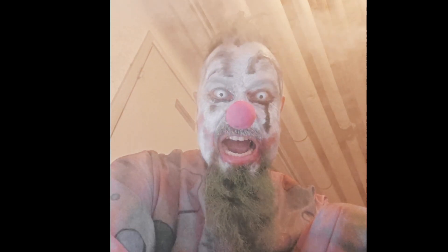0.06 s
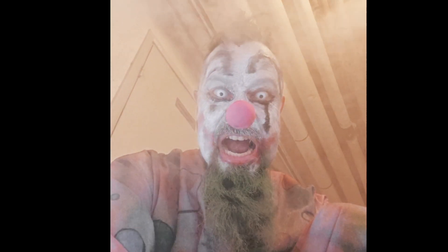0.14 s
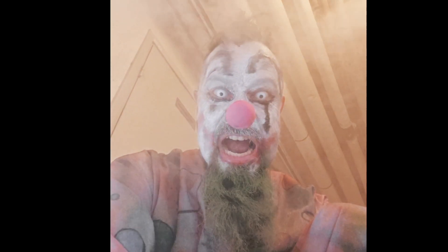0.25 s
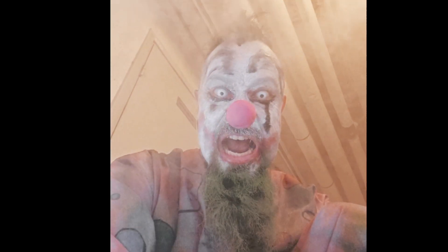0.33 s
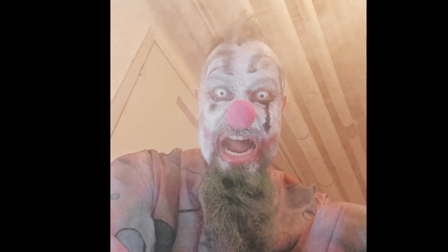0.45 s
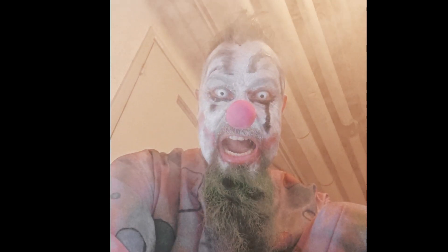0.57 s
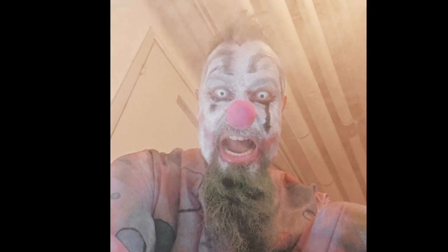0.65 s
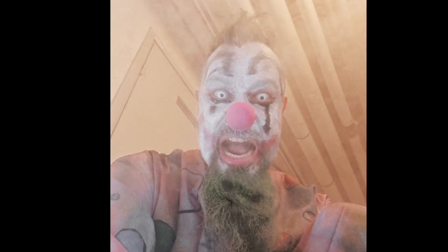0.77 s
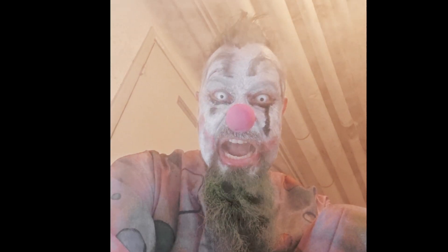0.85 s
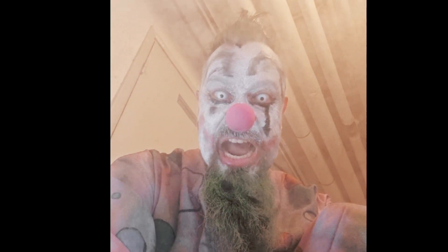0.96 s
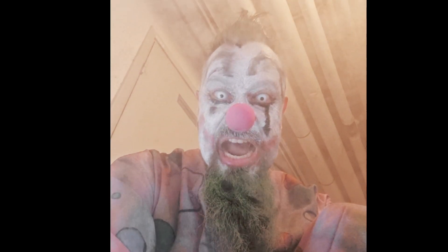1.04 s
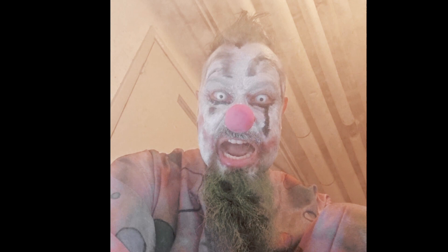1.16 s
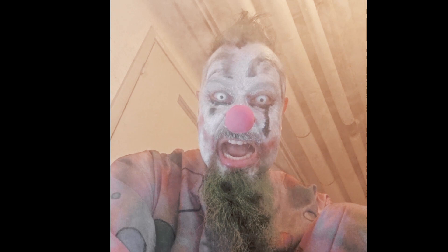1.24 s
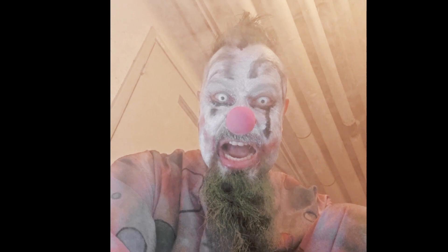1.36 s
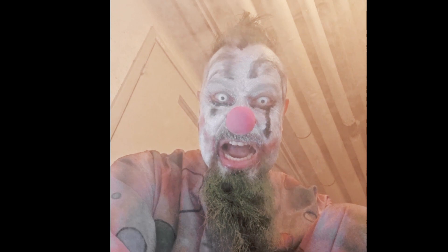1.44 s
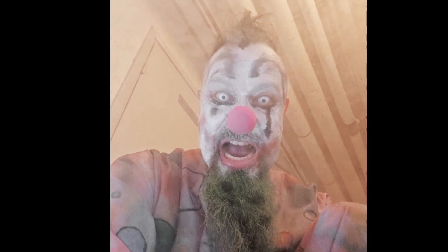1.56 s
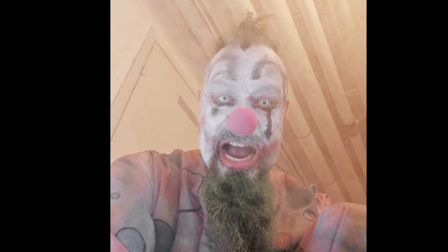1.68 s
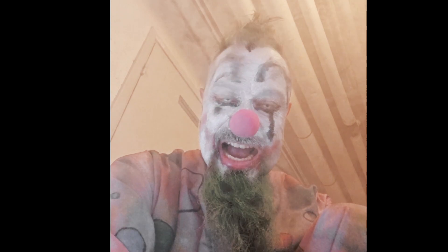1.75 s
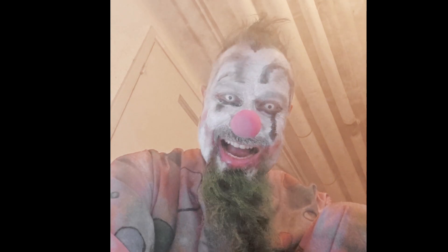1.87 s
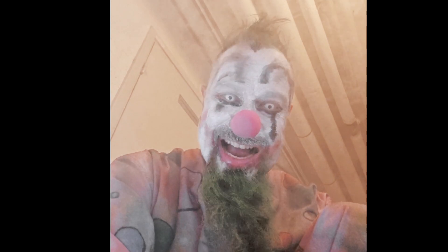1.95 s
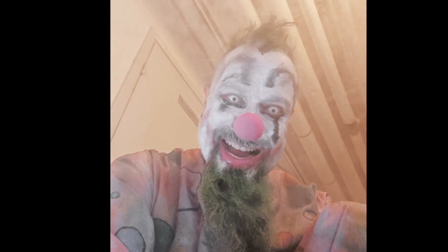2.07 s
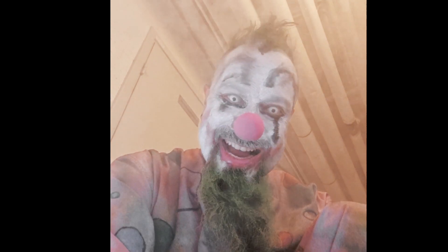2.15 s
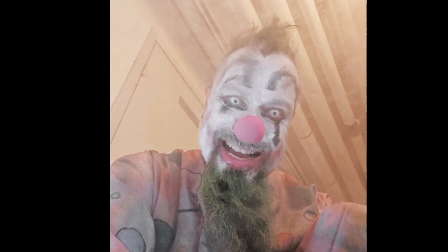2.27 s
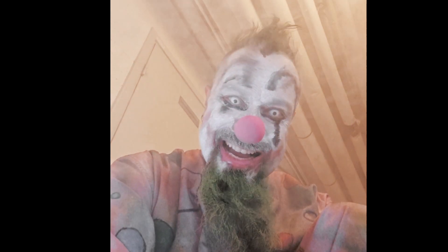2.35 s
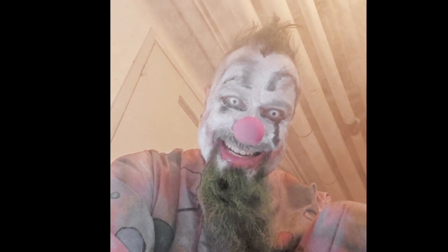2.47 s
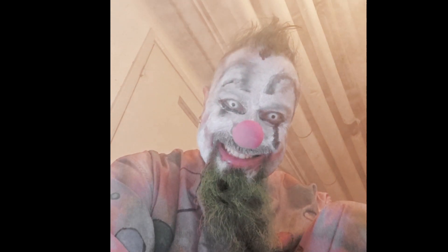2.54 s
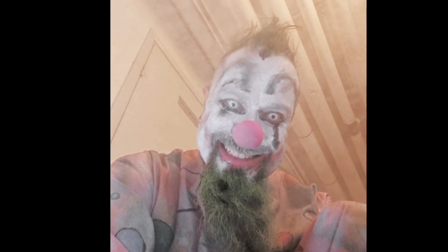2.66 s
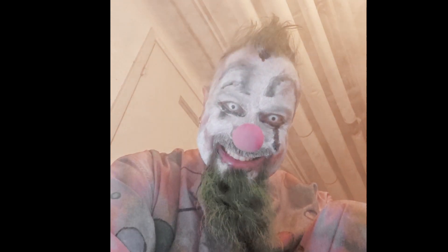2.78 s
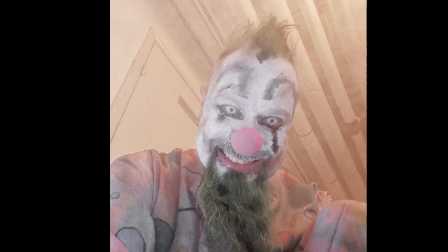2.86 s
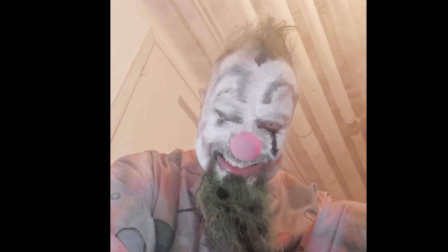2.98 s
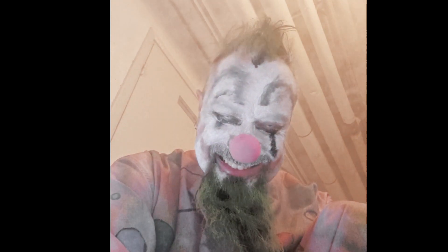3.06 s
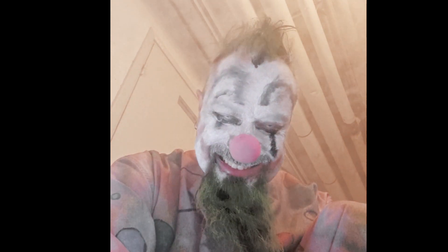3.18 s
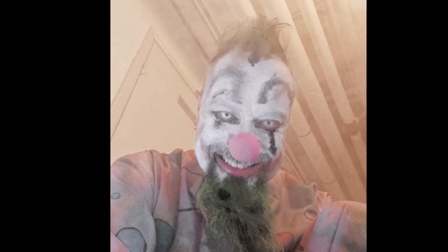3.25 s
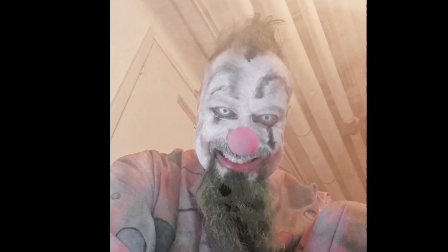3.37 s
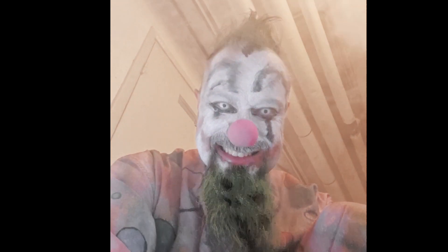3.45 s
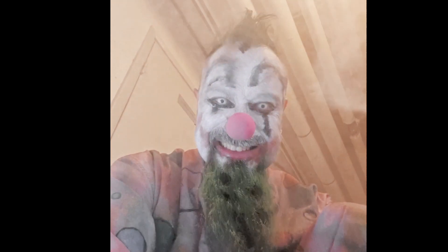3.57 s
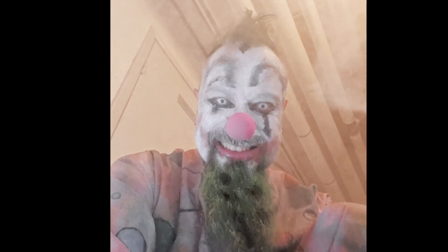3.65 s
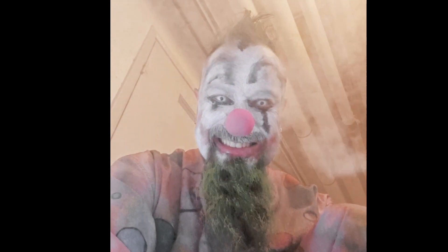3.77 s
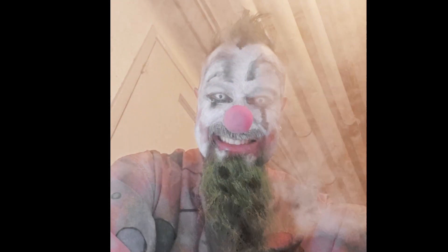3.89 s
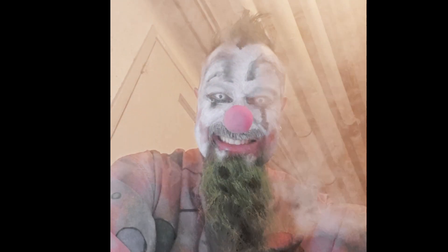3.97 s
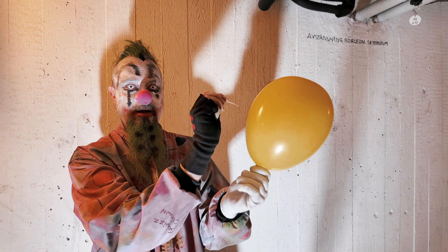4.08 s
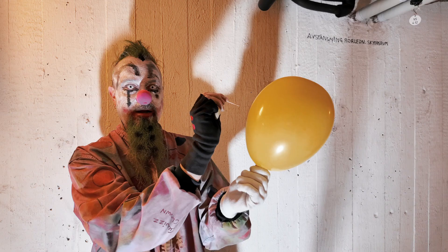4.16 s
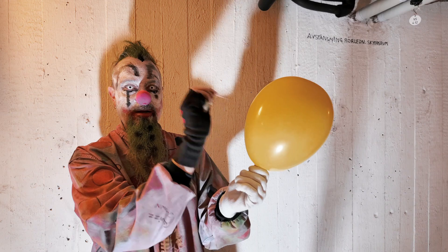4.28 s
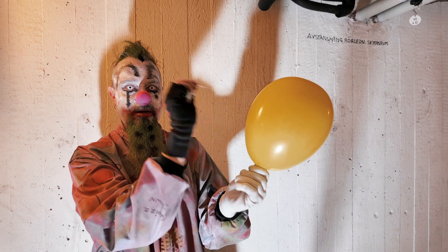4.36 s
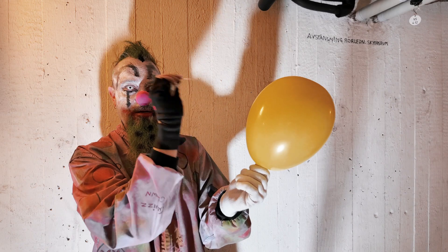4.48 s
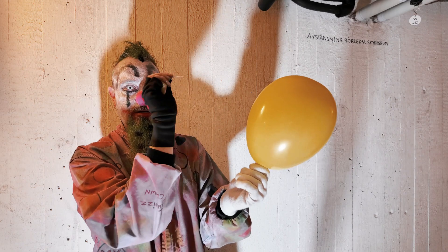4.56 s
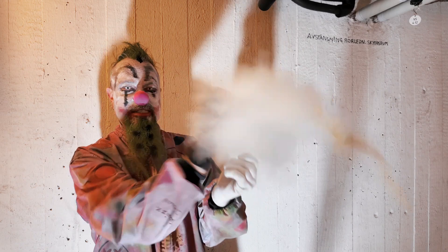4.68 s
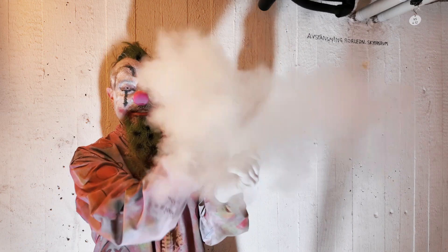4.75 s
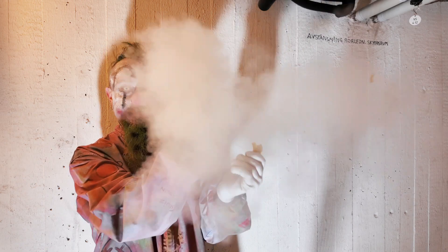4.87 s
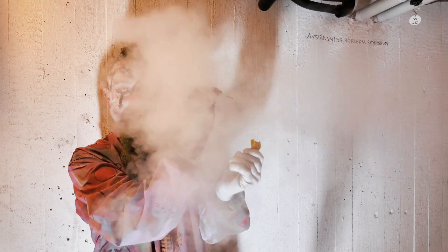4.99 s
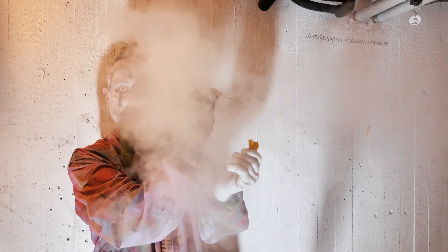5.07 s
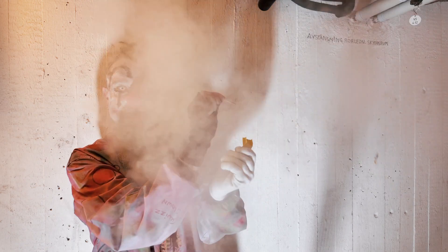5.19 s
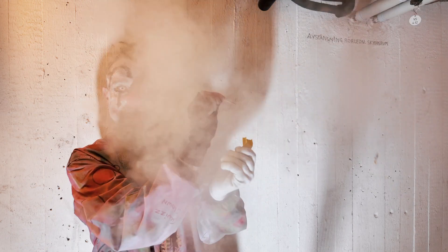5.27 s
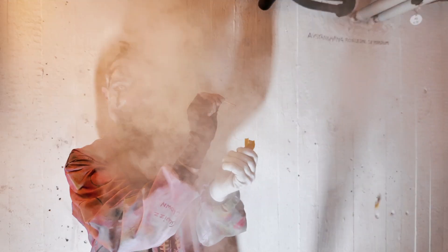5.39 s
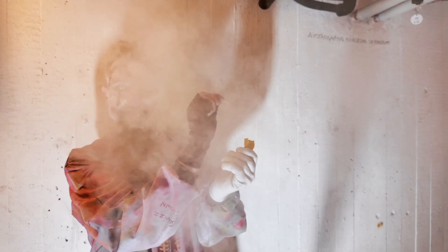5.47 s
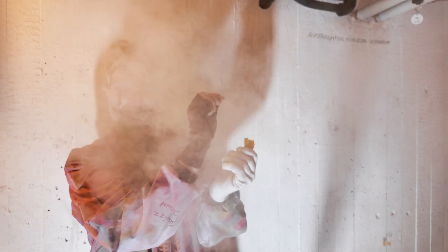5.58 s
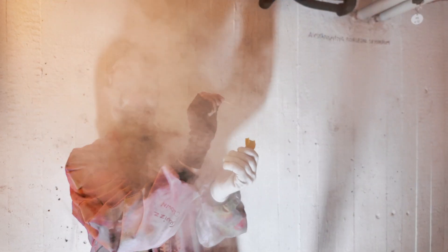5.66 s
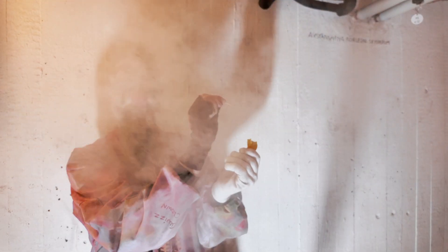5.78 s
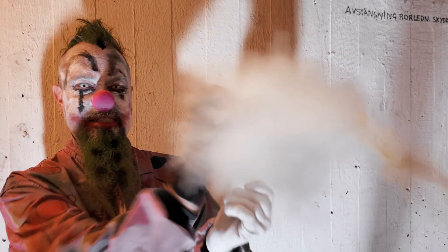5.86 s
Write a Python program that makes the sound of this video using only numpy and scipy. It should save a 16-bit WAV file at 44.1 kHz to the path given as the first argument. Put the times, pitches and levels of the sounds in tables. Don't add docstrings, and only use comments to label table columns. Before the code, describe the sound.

A rough low electric pump buzz with rapid puffing hiss and high valve whine runs for nearly four seconds, then stops at a hard cut. After a short gap and quiet room hum, a pin squeaks on a balloon, which tears and explodes very loudly. The phone's automatic gain ducks and recovers, letting the room's echo bloom; limp scraps land softly before the close motor buzz abruptly resumes.

```python
import sys
import numpy as np
from scipy import signal
from scipy.io import wavfile
from scipy.ndimage import uniform_filter1d

SR = 44100
rng = np.random.default_rng(int(sys.argv[2]) if len(sys.argv) > 2 else 0)


def put_to_file(sound):
    columns = np.atleast_2d(sound).T
    safe = np.clip(columns, -1, 1)
    whole_steps = np.round(safe * 32767)
    wavfile.write(sys.argv[1], SR, whole_steps.astype(np.int16))


def rack_gain(trim_db):
    fader = np.asarray(trim_db, float)
    return 10 ** (fader / 20)


N = 261501
T = np.arange(N) / SR
SHAFT_HZ = 105.37
CUTS_S = [
    3.7775,
    3.982,
    5.7495,
]
MOTOR_END_S, ROOM_START_S, MOTOR_BACK_S = CUTS_S


def evened(x):
    return x / np.sqrt(np.mean(x ** 2) + 1e-20)


def read(points, hz):
    f, value = np.transpose(points)
    return np.interp(np.log(hz + 1), np.log(f + 1), value)


def curve(points):
    return np.interp(T, *np.transpose(points))


# freq_hz, likeness_0_1
PORT_LIKENESS = [(60, 0.7), (130, 0.97), (290, 0.94), (640, 0.82), (1410, 0.5), (3100, 0.0), (6820, 0.37),
                 (15000, 0.8)]


def noise(colour, patchy_db, balance=((1, 0), (2, 0)), size=1024):
    frames, hz = N * 4 // size + 5, np.fft.rfftfreq(size, 1 / SR)
    a, b, c, d, patches = rng.standard_normal((frames, len(hz), 5)).T
    patches = uniform_filter1d(patches, size=8, axis=0)
    patches = evened(uniform_filter1d(patches, size=10, axis=1))
    same = np.clip(read(PORT_LIKENESS, hz), -1, 1)[:, None]
    left = a + 1j * b
    right = same * left + np.sqrt(1 - same ** 2) * (c + 1j * d)
    lean_db = read(balance, hz)[:, None] / 2
    level_db = read(colour, hz)[:, None] + patchy_db * patches
    z = np.array([left, right]) * rack_gain(level_db + np.array([lean_db, -lean_db]))
    return z, hz, np.arange(frames) * size / 4 / SR


def sound(z):
    size = 2 * z.shape[1] - 2
    return signal.istft(z, nperseg=size, noverlap=size * 3 // 4)[1][:, :N]


def resonate(x, hz, width_hz):
    turn, r = np.exp(2j * np.pi * hz * T), np.exp(-np.pi * width_hz / SR)
    return 2 * (turn * signal.lfilter([1 - r], [1, -r], x / turn)).real


def drift(rate_hz):
    knots = np.arange(0, T[-1] + 1, 1 / rate_hz)
    return np.interp(T, knots, rng.standard_normal(len(knots)))


def starved(x, margin_db, depth_db, from_hz=3000):
    hz, _, z = signal.stft(x, SR, nperseg=2048, noverlap=1536)
    power = uniform_filter1d((abs(z) ** 2).mean(0), size=3, axis=0)
    level_db = 10 * np.log10(abs(power) + 1e-20)
    weak = np.clip((level_db.max(0) - margin_db - level_db) / 3, 0, 1) * (hz > from_hz)[:, None]
    return signal.istft(z * rack_gain(depth_db * weak), SR, nperseg=2048, noverlap=1536)[1][:, :N]


# freq_hz, density_db_per_hz
ROOM_COLOUR = [(15, -62), (25, -22), (53, -7.5), (166, -12), (212, -4), (270, -11), (463, -18.5),
               (659, -18.5), (714, -17.5), (1020, -21), (1190, -21), (6560, -35.5), (16000, -38)]
# freq_hz, width_hz, level_db
ROOM_HUM = [(73, 8, -72), (143, 10, -68), (211, 9, -65), (577, 8, -84), (620, 12, -84), (720, 6, -77),
            (738, 7, -81)]
# multiple_of_repeat_rate, level_db
STUTTER_HUM = [(2, -76), (3, -61), (4, -77), (5, -63)]


def room(stutter_s=1024 / 48000, stutter_end_s=4.075, level_db=-66.5):
    out = rack_gain(level_db) * evened(sound(noise(ROOM_COLOUR, 1.2)[0]))
    for hz, width_hz, db in ROOM_HUM:
        hum = resonate(rng.standard_normal(N), hz, width_hz)
        hum = evened(resonate(hum, hz, 2 * width_hz))
        out += rack_gain(db - 9.8 * (hz > 500) * (T < stutter_end_s + stutter_s)) * hum
    early = T < stutter_end_s
    left_s = (stutter_end_s - T) % stutter_s * early
    at = np.round(np.where(early, stutter_end_s - left_s, T) * SR).astype(int).clip(0, N - 1)
    ahead = (at + round(stutter_s * SR)).clip(0, N - 1)
    out = out[:, at] + left_s / stutter_s * (out[:, ahead] - out[:, at])
    repeats = (T - stutter_end_s) / stutter_s
    return out + early * sum(rack_gain(db) * np.sin(2 * np.pi * round(k) * repeats) for k, db in STUTTER_HUM)


# peak_s, length_s, freq_hz, level_db
SWELLS = [
    (.65, 0.33, 2920, -64),
    (.9, .25, 1300, -70),
    (1.3, 0.14, 1310, -73),
    (3.4, 0.44, 1270, -62),
    (3.62, 0.16, 5000, -75),
    (5.85, .2, 1290, -58),
]


def swells(width_share=0.14):
    out = np.zeros((2, N))
    for s, length_s, hz, db in SWELLS:
        air = rng.standard_normal((2, N))
        band = resonate(air + air[::-1] / 2, hz, width_share * hz)
        band = evened(resonate(band, hz, 2 * width_share * hz))
        out += rack_gain(db) * np.exp(-((T - s) / length_s) ** 2) * band
    return out


# peak_s, level_db
TICKS = [
    (3.385, -66),
    (3.443, -65),
    (3.620, -64),
    (3.648, -55),
    (3.677, -64),
    (3.705, -57),
    (3.727, -70),
]


def ticks(hz=12500, width_ms=0.13):
    return sum(rack_gain(db) * np.exp(-((T - s) * 1000 / width_ms) ** 2) * np.cos(2 * np.pi * hz * (T - s))
               for s, db in TICKS)


def shaft_angle():
    return 2 * np.pi * SHAFT_HZ * (T - np.where(T < ROOM_START_S, 3.7672, 5.7596))


# freq_hz, density_db_per_hz
AIR_COLOUR = [(15, -30), (30, -6.5), (60, -6.5), (110, -3), (143, 5), (180, -7), (400, -10.5), (900, -11),
              (1600, -12), (3500, -14), (4600, -20.5), (6200, -20), (7700, -26), (8200, -33), (16000, -42)]
# freq_hz, left_minus_right_db
AIR_BALANCE = [(60, 1), (400, -4), (2000, -2), (6000, -6), (15000, 7)]
# time_s, level_db
BRIGHT = [(0, 1.5), (.8, 0.8), (1.6, -0.1), (2.6, -1), (3.3, -0.5), (3.78, 1.5), (5.75, 1.5)]


def pumped_air(level_db=-58):
    angle = shaft_angle()
    puffs = 1 + 0.62 * np.cos(3 * angle) + 0.17 * np.cos(angle)
    hiss = evened(sound(noise(AIR_COLOUR, 2.2, AIR_BALANCE)[0]))
    low = uniform_filter1d(hiss, size=40)
    return rack_gain(level_db) * (low + (hiss - low) * puffs * rack_gain(curve(BRIGHT)))


# freq_hz, level_db
WHINE = [(5270, -79), (5700, -77), (6100, -76), (6500, -79), (6800, -83.5), (7100, -76.5), (7300, -81.5)]
STROKE_DB = [-1, -6.5, -1.5]
# freq_hz, level_db
RINGING = [(3688, -78), (3898, -80), (4005, -80), (5373, -72), (6320, -71), (7477, -87), (7903, -87),
           (9270, -93), (10115, -93), (10535, -91), (10853, -87), (11170, -92), (11693, -97), (12118, -97)]


def high_orders():
    band = {k: read(WHINE, k * SHAFT_HZ) + STROKE_DB[k % 3] for k in range(50, 70)}
    ringing = {round(hz / SHAFT_HZ): db for hz, db in RINGING}
    return {**band, **ringing}


# freq_hz, level_db
COMB = [(3500, -80), (4500, -98), (5500, -60.5), (7300, -106), (8200, -101), (11000, -95), (13000, -102)]


def weak_orders():
    k, turn = np.setdiff1d(np.arange(35, 125), list(high_orders())), np.linspace(0, 2 * np.pi, 4097)
    size = rack_gain(read(COMB, k * SHAFT_HZ) + 3.8 * rng.standard_normal((2, len(k))))
    phase = rng.uniform(0, 2 * np.pi, (2, len(k), 1))
    patterns = (size[..., None] * np.cos(k[:, None] * turn + phase)).sum(1)
    angle = shaft_angle() % (2 * np.pi)
    return np.array([np.interp(angle, turn, pattern) for pattern in patterns])


# time_s, share_0_1
TURNED = [(0, 0.2), (.3, 0), (2.6, 0.06), (3.15, 0.1), (3.35, 0.58), (3.55, 0.88), (3.78, 1), (5.75, 0.99),
          (5.93, 1)]
# freq_hz, lead_rad
WHINE_LEAD = [(3500, -.3), (4800, 1.6), (5400, .9), (6000, 0.1), (16000, 0.05)]


def valve_whine(phase_scatter_rad=0.81, shaded_db=-10):
    turned, angle, out = np.clip(curve(TURNED), 0, 1), shaft_angle(), np.zeros((2, N))
    for k, db in high_orders().items():
        hz = k * SHAFT_HZ
        level_db = db + (hz < 4500) * shaded_db * turned + 1.0 + curve(BRIGHT) + 1.35 * drift(4.09)
        lead = np.array([[np.interp(hz, *np.transpose(WHINE_LEAD))], [0]])
        phase = 2 * np.pi / 3 * k ** 2 + rng.normal(0, phase_scatter_rad) + lead
        out += np.sqrt(2) * rack_gain(level_db) * np.cos(k * angle + phase)
    return out


def low_orders(bed, strong, scatter):
    left_shadow_db, bed_scatter_db, lead_rad_per_khz = -6.5, 2, 0.57
    hz = np.arange(1, 35) * SHAFT_HZ
    chance = rng.standard_normal((len(hz), 3)).T
    right = read(bed, hz) + bed_scatter_db * chance[0]
    left = right + left_shadow_db + bed_scatter_db * chance[1]
    rows = np.transpose([left, right, hz / 1000 * (lead_rad_per_khz + scatter * chance[2])])
    for k, *row in strong:
        rows[round(k) - 1] = row
    return rows


# multiple, left_db, right_db, left_lead_rad
ASIDE = [(3, -64, -56, -.2), (5, -82, -64, -1.2), (6, -60, -65, .4), (7, -67, -71, -.5), (8, -74, -64, 2.6),
         (9, -58, -49, 1.1), (10, -57, -53, -.2), (11, -68, -66, 2.5), (12, -63, -69, .3),
         (13, -67, -65, 1.2), (14, -61, -57, -2.7), (15, -80, -71, -2.4), (16, -68, -68, 2.5),
         (18, -73, -76, 0.), (31, -77, -70, .6), (19, -73, -68, 1.2), (21, -75, -65, -2.7),
         (23, -68, -68, 2.8), (26, -69, -65, -.2), (28, -76, -69, -.8), (32, -74, -73, .1),
         (33, -75, -70, .1)]
# multiple, left_db, right_db, left_lead_rad
FACING = [(2, -72, -69, .5), (3, -62, -56, -.5), (6, -54, -57, -.1), (7, -67, -64, -.4), (8, -74, -65, 2.2),
          (9, -62, -52, .4), (10, -63, -56, 2.6), (11, -65, -64, -1.7), (12, -56, -49, -.2),
          (13, -66, -62, 1.3), (14, -59, -53, -.7), (15, -65, -60, -1.5), (16, -65, -62, 2.),
          (19, -70, -61, .5)]
# freq_hz, level_db
BED_ASIDE = [(100, -72), (220, -69.5), (450, -75), (1600, -70), (2300, -75.5), (2600, -81.5), (2850, -73.5),
             (3600, -79.5)]
# freq_hz, level_db
BED_FACING = [(100, -76), (500, -73.5), (1800, -68.5), (2700, -70), (3100, -76), (3300, -74), (3600, -82)]


def shaft_orders(wobble_db=0.05, wobble_per_order_db=0.0393, flutter=0.13, sway_rad_per_order=0.016):
    null_db, null_share, null_width = -16, 0.84, 0.093
    return_db, return_hz, facing_scatter_rad = 5., 2700, .5
    lead_scatter = 0.67
    turned, angle, out = np.clip(curve(TURNED), 0, 1), shaft_angle(), np.zeros((2, N))
    null = null_db * np.exp(-((turned - null_share) / null_width) ** 2)
    both = np.hstack([low_orders(BED_ASIDE, ASIDE, lead_scatter),
                      low_orders(BED_FACING, FACING, lead_scatter / 4)])
    for k, (left, right, lead, left_on, right_on, lead_on) in enumerate(both, 1):
        level_db = np.outer([left, right], 1 - turned) + np.outer([left_on, right_on], turned)
        level_db += (k == 9) * null
        level_db += (T > ROOM_START_S) * return_db * np.exp(-np.log(k * SHAFT_HZ / return_hz) ** 2 / .08)
        level_db += (wobble_db + k * wobble_per_order_db) * np.array([drift(2.95), drift(2.97)])
        lead = lead + turned * np.angle(np.exp(1j * (lead_on - lead)))
        lead = lead + k * sway_rad_per_order * drift(2.1) * (1 - turned)
        spread = [2.5 * (1 - turned), facing_scatter_rad * turned * (1 - (k > 15) / 2)]
        late = rng.standard_normal(2) @ spread + .6 * turned
        uneven = 1 + flutter * drift(70)
        out += np.sqrt(2) * rack_gain(level_db) * uneven * np.cos(k * angle + late + np.outer([1, 0], lead))
    return out


def motor():
    return shaft_orders() + valve_whine() + weak_orders() + pumped_air()


def gain_control(start_s=4.785, clamp_db=-16.5, attack_s=0.0059, hold_s=0.12, release_s=.11):
    since = np.maximum(T - start_s, 0)
    return clamp_db * (1 - np.exp(-since / attack_s)) * np.exp(-np.maximum(since - hold_s, 0) / release_s)


# start_s, level_db, rise_s, t60_s
SCRAPS = [
    (5.18, -61, .005, 0.096),
    (5.418, -49, 0.014, 0.32),
    (5.447, -56, .003, .1),
    (5.58, -73, 0.0039, 0.082),
]
# freq_hz, density_db_per_hz
SCRAP_COLOUR = [(500, -17.5), (1500, 6.5), (4000, 8.5), (6500, -2.5), (10000, -0.5), (16000, -9.5)]


def scraps():
    shape = np.zeros(N)
    for s, db, rise_s, t60_s in SCRAPS:
        since = np.maximum(T - s, 0)
        shape += rack_gain(db - 60 * since / t60_s) * np.clip(since / rise_s, 0, 1)
    return shape * evened(sound(noise(SCRAP_COLOUR, 1.8, size=256)[0]))


# freq_hz, density_db_per_hz
TAIL_COLOUR = [(24, -44.5), (40, -30.5), (164, -9), (228, -7), (332, -5), (608, -11), (744, -9),
               (1510, -7.5), (1990, -14), (2370, -14.5), (2760, -17), (14900, -30), (16500, -59.5)]
# freq_hz, t60_s
TAIL_T60 = [(60, 0.51), (130, 1.21), (260, 1.155), (700, 0.91), (1800, 0.7), (4800, 0.5), (9000, 0.39),
            (16000, 0.2)]
# freq_hz, level_db, t60_s
ROOM_MODES = [(72.9, -14.5, 1.), (126.4, -5.5, .9), (144, -4, 1.1), (208.8, -0.5, 1.17),
              (244.5, 1.5, 1.206), (321.2, -1, 0.91), (354.5, -6, 0.76), (367, -2.5, 1.), (511, -11, 1.14)]


def reverberation(start_s=4.787, tail_db=-21, modes_db=-30.5, escape=0.23, rest_db=20):
    z, hz, t = noise(TAIL_COLOUR, 0.76, size=512)
    level = np.sqrt(np.mean(sound(z) ** 2))
    decay_db = -60 * np.maximum(t - start_s, 0) / read(TAIL_T60, hz)[:, None]
    field = rack_gain(tail_db) / level * sound(z * rack_gain(decay_db))
    since = np.maximum(T - start_s, 0)
    spared_db = escape * gain_control()
    for hz, db, t60_s in ROOM_MODES:
        field += rack_gain(modes_db + db - 60 * since / t60_s - spared_db) * np.sin(2 * np.pi * hz * since)
    return field * rack_gain(rest_db + gain_control()) * np.clip(since / 0.015, 0, 1)


# centre_s, level_db
SQUEAKS = [
    (4.7535, -52),
    (4.761, -43),
    (4.7695, -46),
]


def squeaks(hz=2500, width_ms=1.5):
    return sum(rack_gain(db) * np.exp(-((T - s) * 1000 / width_ms) ** 2) * np.sin(2 * np.pi * hz * (T - s))
               for s, db in SQUEAKS)


# freq_hz, density_db_per_hz
CREAK_COLOUR = [(60, -13.5), (250, -0.5), (700, -3), (1200, -13.5), (1800, -30.5), (2500, -36.5),
                (3300, -45), (16000, -69.5)]


def stretch(start_s=4.749, rise_s=.008, end_s=4.779, level_db=-38):
    shape = np.clip((T - start_s) / rise_s, 0, 1) * np.clip((end_s - T) / 0.004, 0, 1)
    return rack_gain(level_db) * shape * evened(sound(noise(CREAK_COLOUR, 2.4, size=256)[0]))


# start_s, level_db, hold_s, t60_s
TEAR = [
    (4.749, -54.5, .003, .03),
    (4.767, -51, 0.0014, 0.019),
    (4.7771, -17, 0.00046, .0015),
    (4.784, -16, 0.0039, .016),
    (4.788, -31, .004, .12),
]
# freq_hz, density_db_per_hz
CRACKLE_COLOUR = [(300, -22.5), (1000, -0.5), (2000, 2.5), (5000, -4.5), (7000, -10), (10000, -4.5),
                  (13000, -9.5), (16500, -11)]
# freq_hz, left_minus_right_db
CRACKLE_BALANCE = [(1500, 0.5), (5000, -1), (10000, -4.5), (16000, -6)]


def tear(spread=0.7, rise_s=0.00055):
    z, hz, _ = noise(CRACKLE_COLOUR, 1.6, size=256)
    lean_db = read(CRACKLE_BALANCE, hz)[:, None] / 2
    crackle = evened(sound((z[1] + spread * z) * rack_gain([lean_db, -lean_db])))
    shape = np.zeros(N)
    for s, db, hold_s, t60_s in TEAR:
        decay_db = -60 * np.maximum(T - s - hold_s, 0) / t60_s
        shape += np.clip((T - s) / rise_s, 0, 1) * rack_gain(db + decay_db)
    return shape * crackle


# push_to_suck_s, level_db, width_ms, suck_share_of_push
STEPS = [
    (4.7777, -10, .24, .7),
    (4.7873, -1, .3, .3),
    (4.7911, -2, .7, .52),
    (4.7964, -13, .8, .5),
]


def pressure_steps():
    push = np.zeros(N)
    for s, db, width_ms, suck in STEPS:
        u = (T - s) * 1000 / width_ms * np.where(T > s, .8, 1)
        push -= rack_gain(db) * np.where(u > 0, suck, 1) * u * np.exp(.5 - u ** 2 / 2)
    return signal.sosfiltfilt(signal.butter(2, 75, "high", fs=SR, output="sos"), push)


def burst():
    return pressure_steps() + squeaks() + stretch() + tear()


def scene():
    first = np.clip((MOTOR_END_S + .0008 - T) / .003, 0, 1) + np.clip((T - MOTOR_BACK_S) / .004, 0, 1)
    second = np.clip((T - ROOM_START_S) / 0.0073, 0, 1) * np.clip((MOTOR_BACK_S + .012 - T) / .014, 0, 1)
    tail = starved(reverberation(), margin_db=51.5, depth_db=-14.5)
    shot = rack_gain(gain_control()) * room() + burst() + tail + scraps()
    shot = signal.sosfilt(signal.butter(3, 56, "high", fs=SR, output="sos"), shot)
    machine = starved(motor() + ticks() + swells(), margin_db=56, depth_db=-14)
    machine = signal.oaconvolve(machine, signal.firwin(255, 15680, fs=SR)[None], "same")
    return first * machine + second * shot


def band_limit(x):
    return signal.sosfilt(signal.butter(12, 16880, fs=SR, output="sos"), x)


def record(dry):
    limited = signal.oaconvolve(dry, signal.firwin(511, 16100, fs=SR)[None], "same")
    return band_limit(np.clip(limited, -.96, .96))


dry = scene()
out = record(dry)
put_to_file(out)
```